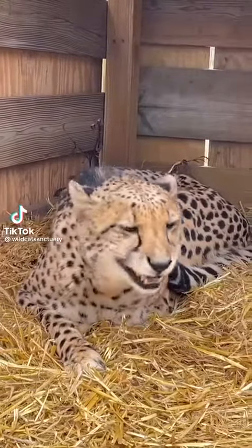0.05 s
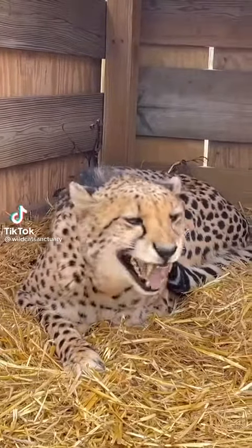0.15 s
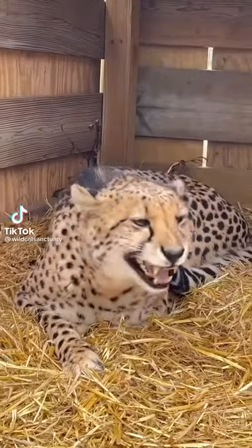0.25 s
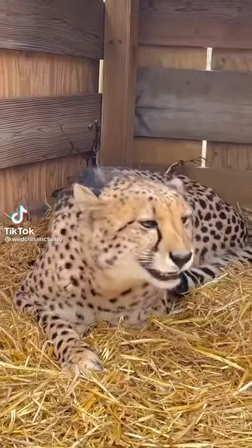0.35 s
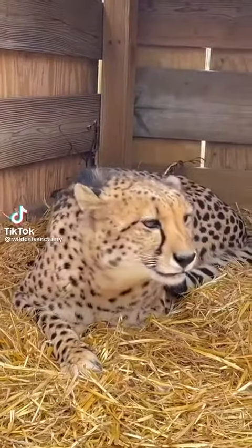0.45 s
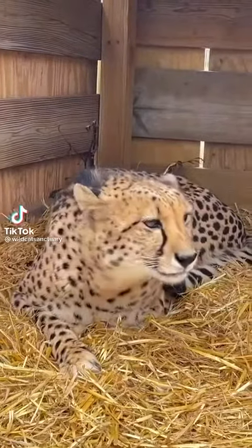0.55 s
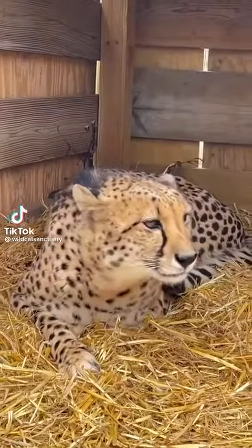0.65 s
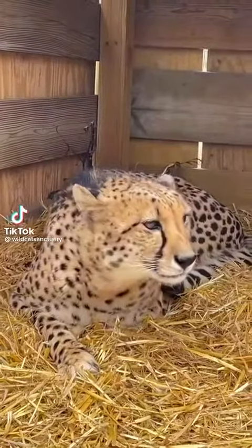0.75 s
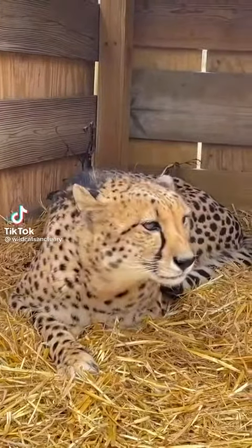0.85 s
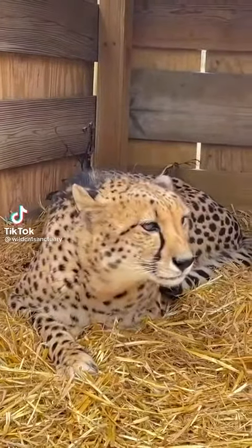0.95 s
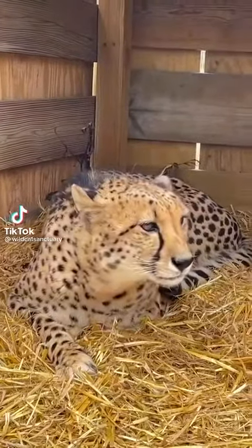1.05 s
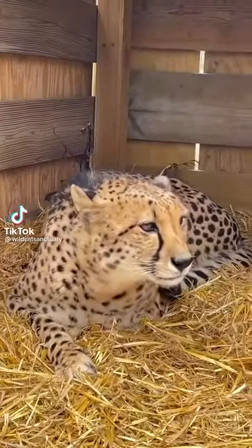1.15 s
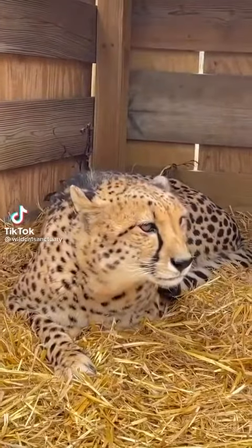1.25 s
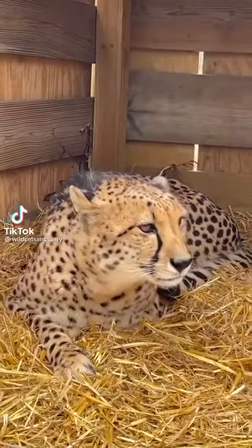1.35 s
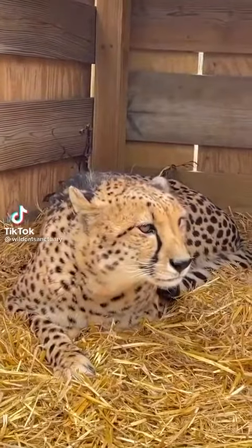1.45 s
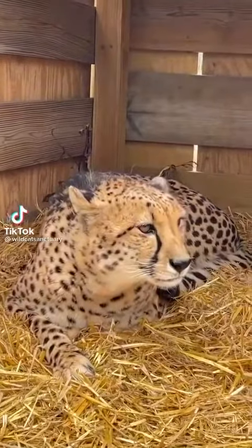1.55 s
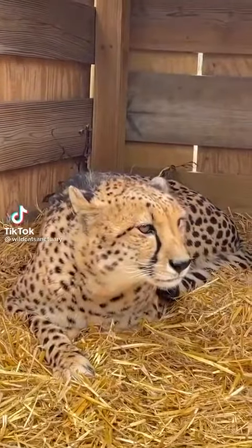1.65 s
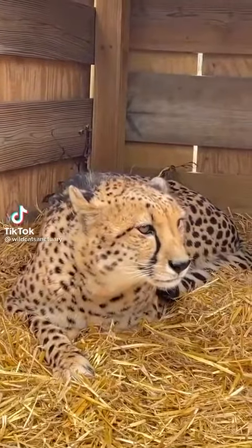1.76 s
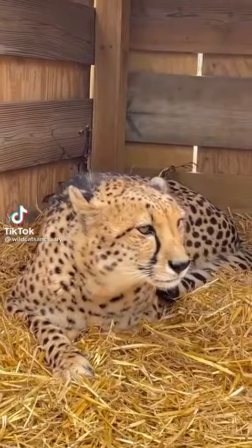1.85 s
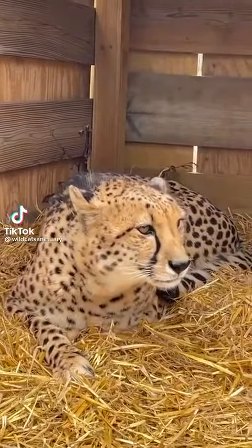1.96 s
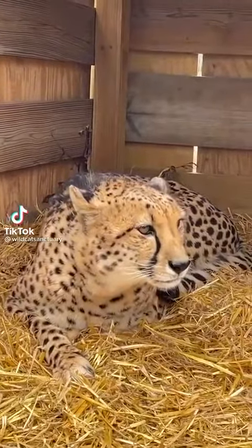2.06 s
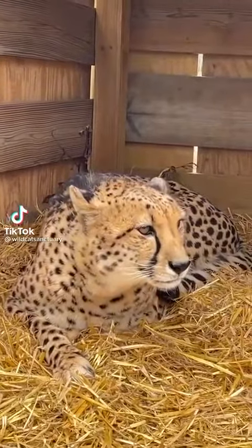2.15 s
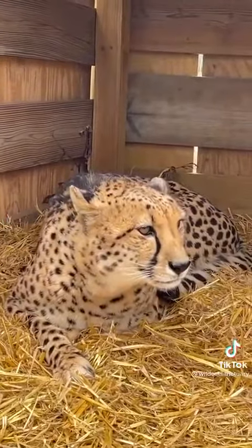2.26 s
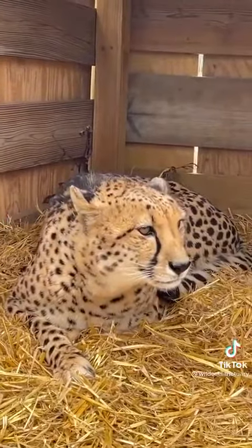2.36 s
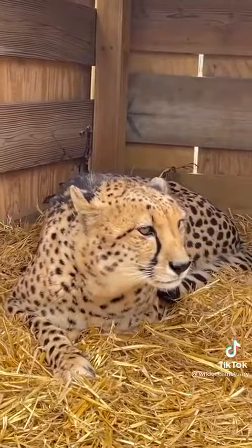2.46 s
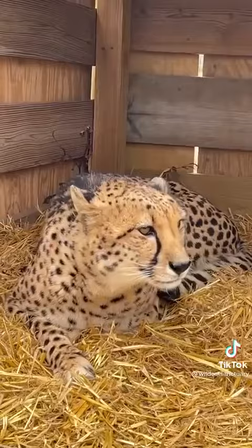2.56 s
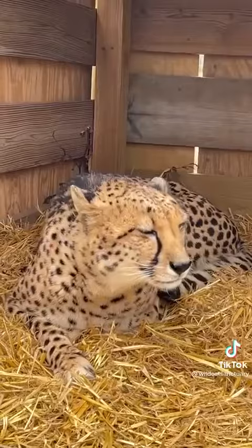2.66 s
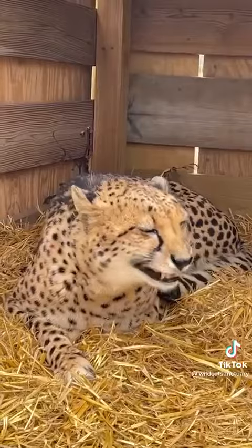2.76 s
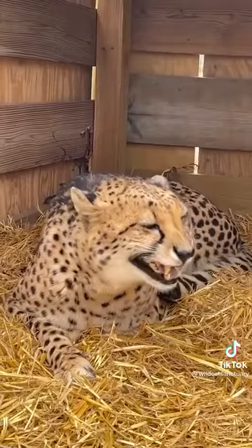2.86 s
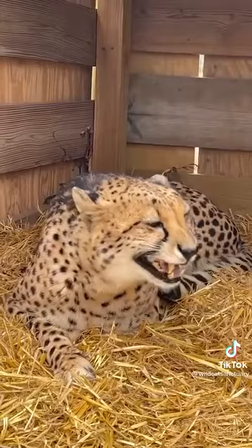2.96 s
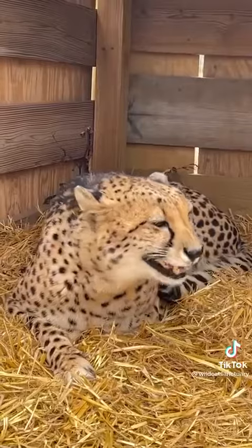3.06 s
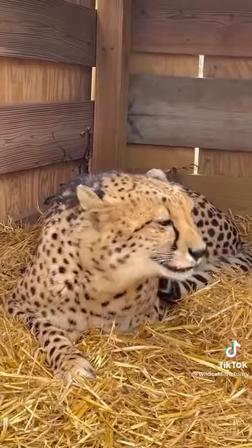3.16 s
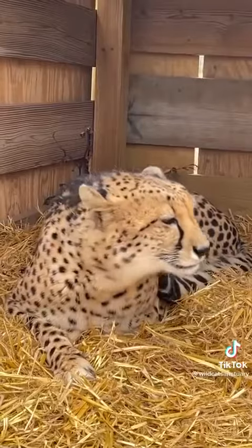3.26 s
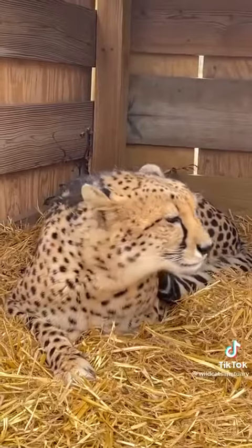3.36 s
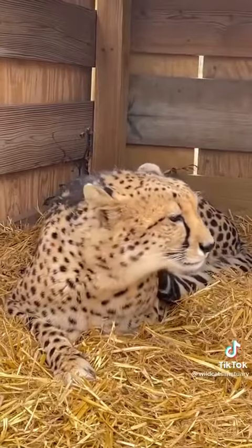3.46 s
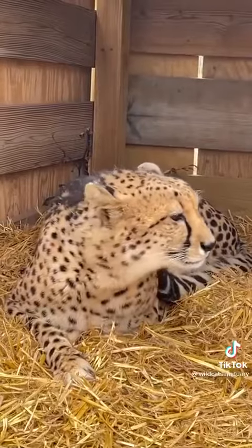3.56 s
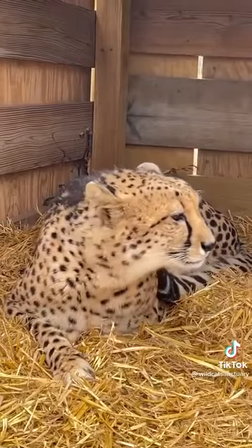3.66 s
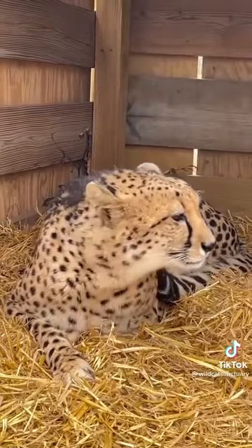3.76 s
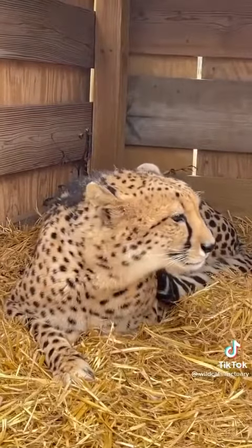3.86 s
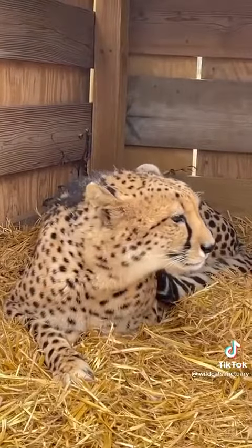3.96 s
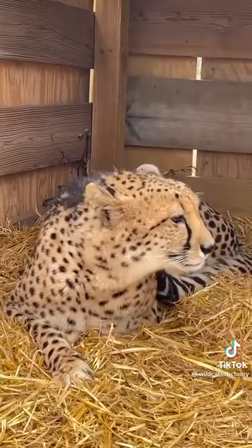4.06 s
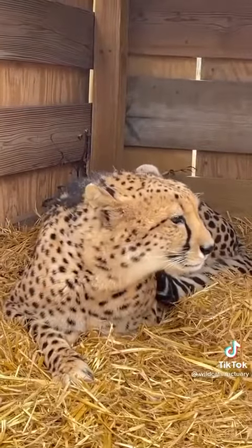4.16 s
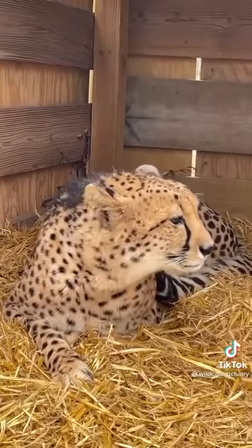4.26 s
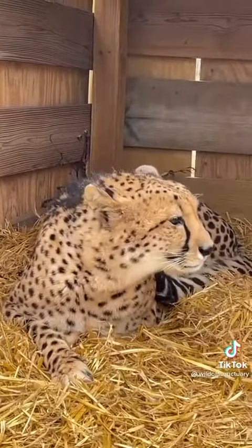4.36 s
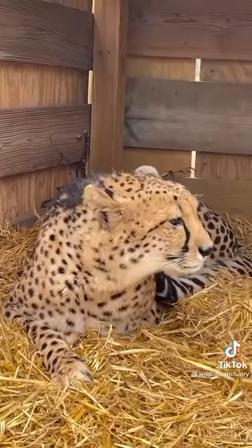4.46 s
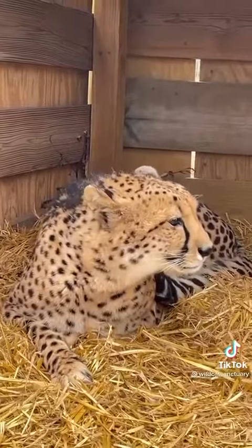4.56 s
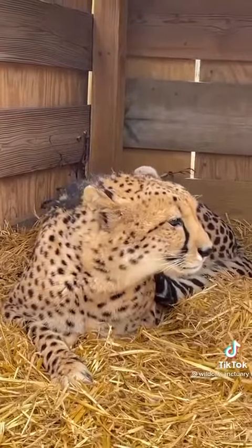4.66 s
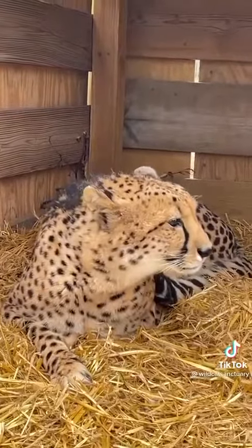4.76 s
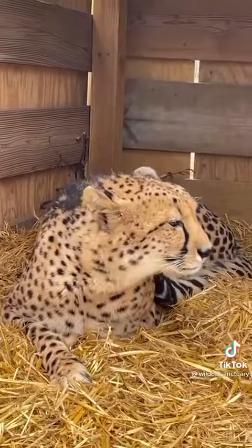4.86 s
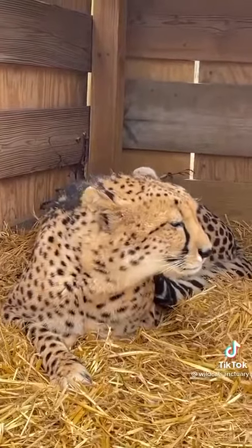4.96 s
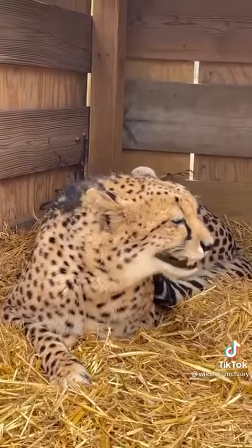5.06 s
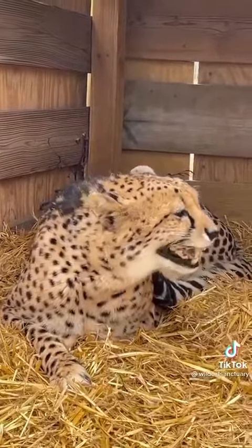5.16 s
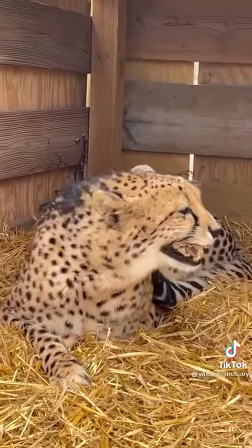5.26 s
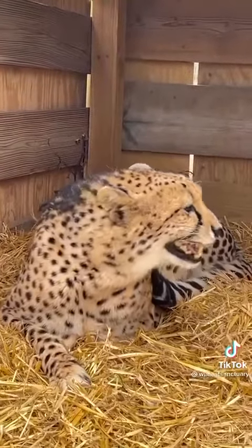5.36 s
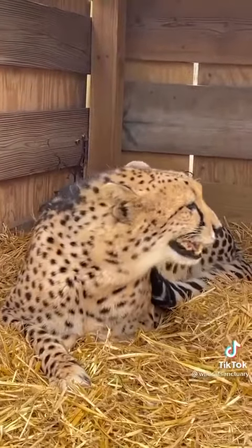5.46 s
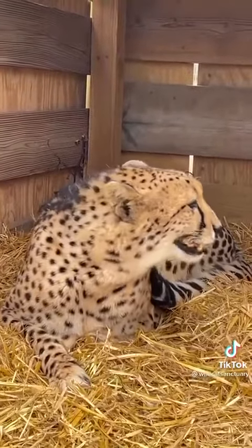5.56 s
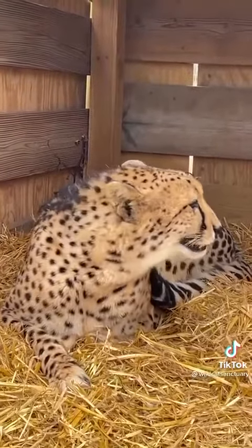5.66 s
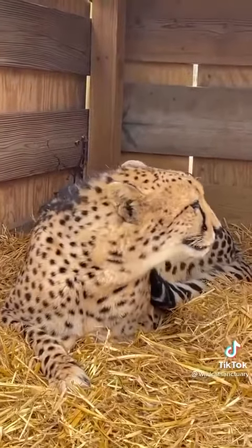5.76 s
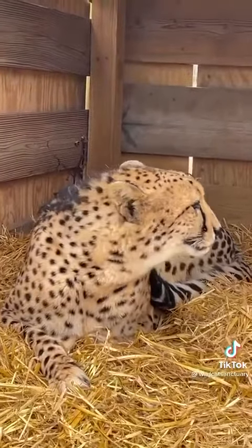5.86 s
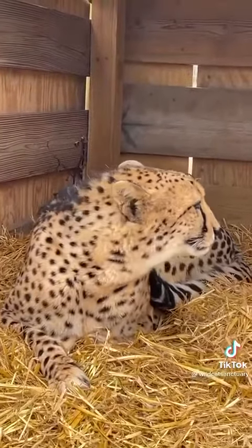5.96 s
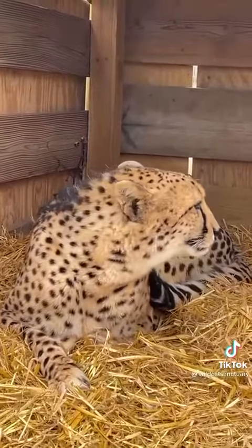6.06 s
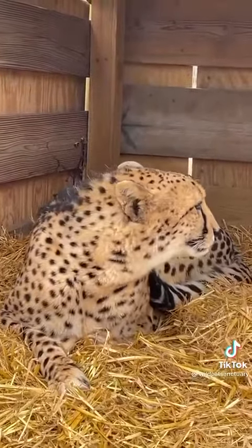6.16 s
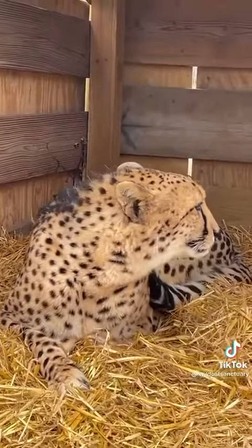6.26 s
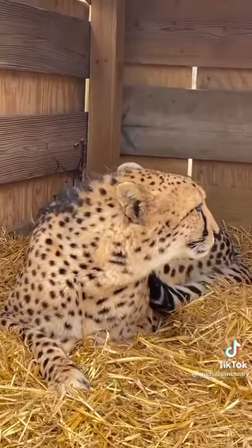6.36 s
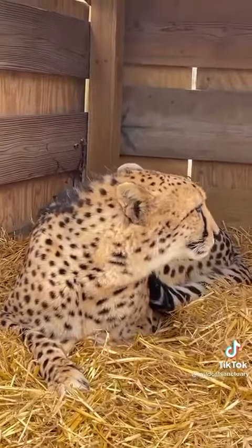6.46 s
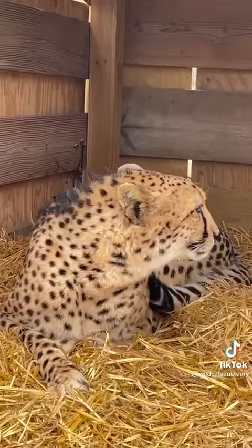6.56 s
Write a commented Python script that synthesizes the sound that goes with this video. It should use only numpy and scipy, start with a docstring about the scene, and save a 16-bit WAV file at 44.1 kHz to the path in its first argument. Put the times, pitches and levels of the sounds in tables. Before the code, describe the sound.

A cheetah gives three short, bird-like chirps that slide down in pitch, while a one-cylinder engine outside slows from low rumble to quiet idling throb.

```python
"""Outside a wooden, straw-bedded shelter a one-cylinder engine slows to idle: firing pulses ring exhaust
resonances. Inside, a couple of metres from a phone, a big cat chirps at 0.1, 2.7 and 5.1 s: gliding partials
plus breath noise, echoed by the boards. Dry straw ticks come before or during the chirps; brakes rub softly
(noise) at 0.6 and 2.15 s, then squeal (pure tones) from 2.4 to 3.5 s. At 6.5 s the straw gives a dull thud and
a rustle. Faint open-air hiss, made of coloured noise, lies behind throughout."""
import sys
import numpy as np
from scipy import signal
from scipy.fft import rfft, irfft
from scipy.io import wavfile
from scipy.ndimage import uniform_filter1d

SR = 44100
rng = np.random.default_rng(int(sys.argv[2]) if len(sys.argv) > 2 else 0)


def unload_audio(sound):
    """Save the sound as a 16-bit wav file, at the path given as the first command line argument."""
    columns = np.transpose(np.atleast_2d(sound))
    # keep every value between -1 and 1, then stretch to whole-number steps
    steps = np.round(np.clip(columns, -1, 1) * 32767)
    wavfile.write(sys.argv[1], SR, steps.astype(np.int16))


N = 291060  # samples, 6.6 s

# Glide and spectrum of the voice, one table a call: time_s, pitch_hz, partial_1_db to partial_5_db,
# palate_db, nasal_db, hiss_db, rasp_db (relative to the partials)
CHIRP_GLIDES = [
    [(0.088, 775, -61.5, -34.5, -70.5, -76.5, -103, -92, -75.5, -103, -35),
     (0.112, 750.7, -42.5, -38.5, -32.5, -52.5, -79.5, -63.5, -65.5, -88, -29),
     (0.13, 779, -59.5, -33.5, -50, -33.5, -93.5, -50, -55.5, -52.5, -33),
     (0.14, 822.2, -49.5, -29, -48, -36.5, -60.5, -57, -63.5, -52.5, -32.5),
     (0.154, 828.4, -45.5, -28.5, -41.5, -47, -50, -55, -63, -50.5, -30),
     (0.168, 826, -43.5, -27.5, -44, -43, -50, -51, -62.5, -69, -30.5),
     (0.184, 788, -39.5, -26, -49, -31, -58, -36, -64, -69.5, -34),
     (0.2, 733, -42.5, -26, -35.5, -28, -88, -45.5, -58.5, -85, -41.5),
     (0.222, 660, -34.5, -16, -19, -60.5, -35, -53, -57, -57.5, -35.5),
     (0.236, 621.7, -35, -17, -22.5, -38.5, -51.5, -44.5, -60, -58, -39),
     (0.262, 592.6, -32.5, -19, -23, -55, -49.5, -56.5, -71, -57, -31),
     (0.278, 560, -33.5, -27, -29.5, -56.5, -44, -65.5, -64.5, -78, -37),
     (0.292, 559.3, -39, -35.5, -31, -57.5, -56, -76, -67, -64, -36),
     (0.314, 579.4, -40.5, -47, -38, -75.5, -81, -84.5, -72, -99.5, -36.5),
     (0.328, 609.8, -49.5, -48, -49, -91.5, -96.5, -82, -71, -74, -36),
     (0.356, 668, -52.5, -43.5, -76, -91.5, -106, -99, -79.5, -103, -34.5),
     (0.372, 676, -55, -45, -66, -88, -100, -90, -80.5, -92, -29.5),
     (0.398, 669, -60.5, -41, -76.5, -92.5, -100, -86, -65.5, -82, -30),
     (0.414, 656, -61.5, -40.5, -58, -80, -91, -96.5, -88.5, -87, -30.5),
     (0.428, 644.5, -52, -45, -48.5, -72.5, -82.5, -97.5, -92, -85, -40.5),
     (0.442, 547.1, -35, -50.5, -54, -74.5, -76.5, -101, -93, -88.5, -26),
     (0.468, 555.5, -55, -58.5, -84.5, -91, -90, -94, -88.5, -89, -28.5),
     (0.49, 516.5, -67.5, -74.5, -74.5, -80, -89.5, -86, -88, -88.5, -32.5)],
    [(2.704, 593, -50, -49, -65, -78, -70.5, -101, -97.5, -82, -27),
     (2.736, 555, -40.5, -35, -35.5, -52.5, -67.5, -97, -62, -81, -17),
     (2.752, 566, -35.5, -34.5, -32, -47.5, -52, -74.5, -59.5, -77, -40),
     (2.762, 581, -38, -26, -28.5, -93, -64.5, -74, -60, -70, -41),
     (2.78, 625.4, -40.5, -30, -38.5, -50, -53.5, -66, -57.5, -82, -45),
     (2.826, 671.8, -46, -24.5, -30.5, -52, -64.5, -63.5, -58, -85, -33.5),
     (2.848, 683.5, -44.5, -24.5, -25, -49, -55.5, -60.5, -58.5, -70, -34),
     (2.874, 687.6, -45, -25.5, -28, -43, -52.5, -63, -62, -62.5, -35),
     (2.892, 668.8, -37.5, -18.5, -25.5, -45.5, -44.5, -63.5, -62, -67, -33.5),
     (2.91, 656.6, -36, -23.5, -21.5, -44.5, -47, -53.5, -57, -59.5, -31),
     (2.96, 599, -32.5, -22, -25.5, -48.5, -45.5, -56.5, -56.5, -72, -33),
     (3.012, 551.4, -31.5, -25, -25, -42, -46, -73, -58.5, -79, -34.5),
     (3.038, 552.6, -31.5, -30.5, -27.5, -74.5, -48, -88.5, -55.5, -83, -27),
     (3.074, 534.8, -34, -29, -24, -48.5, -52, -80, -59.5, -73.5, -36.5),
     (3.118, 525.1, -39, -30, -33, -70.5, -69, -82.5, -64, -91, -32.5),
     (3.13, 518.7, -56, -40.5, -42, -59, -81, -90, -67, -79, -35.5),
     (3.162, 493.3, -36.5, -37.5, -51.5, -51.5, -64, -93, -73.5, -89, -34),
     (3.186, 459.8, -29.5, -60, -48.5, -54, -78, -102, -80, -85, -37),
     (3.204, 413.2, -36, -56.5, -34, -57.5, -77, -98, -89, -100, -31),
     (3.222, 414.7, -32, -60, -57.5, -63, -59.5, -91.5, -90, -103, -32),
     (3.256, 434, -54, -90.5, -74, -88, -91, -96, -98, -86, -24),
     (3.29, 435.3, -75, -87, -83, -80, -99, -90.5, -98, -100, -26)],
    [(5.067, 788, -78, -56.5, -74, -83, -100, -100, -89, -91, -22),
     (5.075, 760, -62, -38.5, -52.5, -57, -83.5, -92, -76, -89, -24.5),
     (5.084, 734.4, -40.5, -36.5, -56.5, -61, -71, -90, -70.5, -91, -24.5),
     (5.093, 643.3, -43, -36, -29, -49, -58, -86, -57, -92, -30),
     (5.1, 649.4, -40, -37, -25.5, -47, -50, -88, -61, -92, -33.5),
     (5.107, 671, -47, -28, -33.5, -42, -68.5, -80.5, -47.5, -72, -33),
     (5.121, 736.2, -47.5, -30.5, -51.5, -47.5, -71, -67, -48.5, -65, -43),
     (5.135, 741.7, -34, -35, -32.5, -55.5, -69, -79, -46, -70, -42.5),
     (5.148, 752.5, -40.5, -36, -40, -62.5, -72.5, -80.5, -51.5, -68, -33.5),
     (5.16, 727, -38, -38, -43.5, -60.5, -81, -78.5, -55.5, -74, -31.5),
     (5.171, 705.6, -54, -38.5, -50.5, -53.5, -83, -80, -56, -79, -32),
     (5.183, 686.7, -46, -35.5, -41.5, -59.5, -80, -82, -60.5, -83, -34),
     (5.212, 650.7, -40.5, -38.5, -42, -51.5, -62, -78.5, -63.5, -75.5, -33),
     (5.233, 631.5, -40.5, -27.5, -38, -51.5, -56.5, -76, -56, -68.5, -28),
     (5.283, 590.8, -36, -19.5, -38, -58.5, -49.5, -81, -65.5, -103, -36),
     (5.313, 577.3, -37, -28.5, -25.5, -48, -52.5, -89.5, -69, -77, -36.5),
     (5.367, 559.5, -41, -30.5, -26.5, -60, -50, -72.5, -64.5, -80.5, -34),
     (5.415, 548.3, -38.5, -42, -26, -43.5, -52.5, -72.5, -62.5, -76.5, -45.5),
     (5.511, 540.4, -40, -41, -28, -54.5, -64.5, -72.5, -62, -83, -34),
     (5.565, 513, -34.5, -31.5, -47.5, -52.5, -67.5, -89, -67, -103, -39),
     (5.591, 485.8, -48, -38.5, -46, -59, -85.5, -87.5, -73.5, -78, -30),
     (5.611, 474, -37, -51, -45.5, -52, -59.5, -95.5, -76, -103, -47.5),
     (5.637, 422, -26, -57, -43.5, -65.5, -79.5, -96, -87.5, -102, -30),
     (5.651, 423.5, -25.5, -48, -39, -62, -66, -88, -92, -103, -35.5),
     (5.667, 407.2, -31.5, -47.5, -41, -56, -53, -94, -89, -94, -38),
     (5.713, 442, -55, -79.5, -73, -76, -85, -105, -103, -103, -29.5),
     (5.74, 464, -65, -95, -78, -87.5, -94, -100, -100, -86.5, -35.5)],
]
# Resonances of the palate, then of the nose: centre_hz, width_hz, relative_level_db
PALATE_MODES = [(4050, 400, -4), (4800, 700, 0)]
NASAL_MODES = [(5450, 600, 0), (6250, 800, -5), (7400, 500, -22)]
# Brief dips of the voiced sound: centre_s, half_width_ms, depth_db
VOICE_CATCHES = [(0.211, 2.1, 0.5), (0.356, 15, 6), (2.941, 1.8, 3), (3.202, 5.8, 11.5), (5.123, 1.2, 1.5),
                 (5.174, 1.2, 6)]
# Moments when the voice breaks up: centre_s, half_width_ms, roughness (0-1)
VOICE_BREAKS = [(.09, 14, .35), (.355, 20, .75), (.48, 20, .5), (2.705, 20, .55), (2.77, 50, .12),
                (.21, 60, .06), (3.225, 30, .15), (3.28, 25, .6), (5.074, 10, .45), (5.12, 45, .2),
                (5.6, 20, .1), (5.72, 35, .4)]
# Every other cycle weakens, so half-pitch lines show: centre_s, half_width_ms, depth (0-1)
CYCLE_DOUBLING = [(.095, 10, .3), (.355, 22, .8), (2.72, 18, .4), (5.078, 12, .7), (5.125, 12, .35),
                  (5.165, 18, .2), (5.62, 20, .15)]
STEADY_ROUGHNESS, ROUGH_RASP_DB = 0.012, 14  # rasp gain in dB per unit of roughness
UPPER_RASP_DB, PALATE_RASP_DB, NASAL_RASP_DB = 8, -7, -7

# Reflections from the nearest boards: delay_ms, level_db (relative to the direct sound)
BOARD_ECHOES = [(2.1, -27), (4.7, -29), (7.9, -14)]
SHELTER_T60_S, SHELTER_DB = 0.19, -23.5
# Left-right difference by frequency: frequency_hz, left_lead_half_turns, left_minus_right_db
STEREO_DIFFERENCES = [(300, .05, 0), (900, .05, 2.5), (1400, -.09, 2), (1900, .06, 1), (2900, .2, 0),
                      (4300, .25, 0), (4950, 1, 0), (5350, 1.9, 0), (6700, 2, 0), (7900, 3, 0),
                      (9400, 3, 0), (11300, 4, 0)]

# Engine speed: time_s, firings_per_s
FIRING_RATE = [(0, 26.9), (.4, 25.5), (.8, 24.29), (1.3, 22.06), (1.8, 19.8), (2.2, 17.39), (2.6, 14.51),
               (3.1, 12.88), (3.5, 11.29), (4, 10.69), (4.4, 10.16), (4.9, 10.17), (5.5, 10.15), (6, 10.22),
               (6.6, 10.29)]
# Engine loudness: time_s, level_db
ENGINE_LEVEL = [(0, -25), (1, -29.5), (1.35, -33), (1.78, -34), (2.5, -42.5), (2.8, -46.5), (3.4, -48),
                (3.55, -44.5), (4.2, -47), (5.6, -45), (6.6, -49)]
# Exhaust resonances: centre_hz, width_hz, full_speed_db, idle_db (relative levels)
EXHAUST_MODES = [(50.4, 17, -12.5, -10.5), (70.7, 17, 0.5, 1), (97.2, 20.3, 5, -7.5), (121.5, 28, 1.5, -11),
                 (151.6, 40, -9.5, -22), (215.8, 36, -11.5, -31.5), (306, 88, -29, -52.5)]
FIRST_TURN_CYCLES = .16  # position in the firing cycle at 0 s
FIRING_JITTER_MS = .3  # standard deviation
YARD_ECHO_MS, YARD_ECHO_DB = 21.04, -2.5
# firing pulses against exhaust noise; the idle value fades over this share of the speed range
IDLE_FIRING_DB, RUNNING_FIRING_DB, PICKUP_SPEED = 1.5, -15.5, 0.067

# Soft brake rubs: centre_s, half_length_s, centre_hz, width_hz (each of two resonances), level_db
BRAKE_RUBS = [(.6, .3, 1500, 1900, -78), (2.15, .25, 1200, 350, -80)]
# Brake squeals: start_s, length_s, pitch_hz, level_db (rms at the top of the swell)
BRAKE_SQUEALS = [(2.445, .1, 12100, -58), (2.685, .035, 12130, -68), (2.722, .025, 12180, -54),
                 (2.755, .09, 12150, -60), (2.64, .1, 3225, -73), (3.44, .09, 2230, -82)]
# share of the length at which the top comes; dB below it at start and end
SQUEAL_PEAK_AT, SQUEAL_RISE_DB, SQUEAL_FALL_DB = 0.4, 18, 14

# Dry straw ticks: time_s, impulse_db
STRAW_TICKS = [(.397, -39), (2.5665, -37), (5.05, -55)]
THUD_S, THUD_DB, THUD_RISE_S, THUD_FALL_DB_S = 6.455, -39, 0.01, 45
RUSTLE_S, RUSTLE_DB, RUSTLE_RISE_S, RUSTLE_FALL_DB_S = 6.47, -59.5, 0.036, 140

# Hiss spectrum alike on both sides: frequency_hz, relative_density_db
AIR_SPECTRUM = [(120, -27), (200, 5), (247, -3.5), (431, -13), (656, -19), (1900, -24.5), (2840, -27.5),
                (4800, -35), (6240, -30), (7700, -37), (8550, -51), (10000, -27), (13000, -34.5)]
# Hiss spectrum of opposite sign left and right: frequency_hz, relative_density_db
WIDE_AIR_SPECTRUM = [(120, -30), (200, 3), (1050, -6.5), (1370, -12.5), (1970, -36.5), (2560, -25),
                     (4970, -23.5), (6030, -35), (7050, -18.5), (9330, -18.5), (13000, -36.5)]
AIR_DB, WIDE_AIR_DB = -68.5, -74.5
TOP_HZ = 13300


def undb(db):
    """Decibel law: a level in dB becomes an amplitude ratio."""
    return 10 ** (np.asarray(db) / 20)


def unit(x):
    """Normalisation: scale to an rms of 1."""
    return x / np.sqrt(np.mean(x ** 2))


def columns(table):
    """Linear interpolation: sample indices a table spans and its columns at each of them."""
    s, *cols = np.transpose(table)
    at = np.arange(int(s[0] * SR), min(int(s[-1] * SR), N))
    return at, [np.interp(at / SR, s, c) for c in cols]


def band(x, lo_hz, hi_hz, order=2):
    """Band limiting: a Butterworth filter passes one range of frequencies."""
    return signal.sosfilt(signal.butter(order, [lo_hz, hi_hz], "bandpass", fs=SR, output="sos"), x)


def ring(x, hz, width_hz):
    """Resonance: a two-pole filter with gain 1 at its centre."""
    return signal.lfilter(*signal.iirpeak(hz, hz / width_hz, fs=SR), x)


def walk(rate, size=N):
    """Random modulation: twice-smoothed noise wanders about rate times a second, with spread near 1."""
    pole = np.exp(-2 * rate / SR)
    noise = rng.standard_normal(SR * (size // SR + 1))
    return unit(signal.lfilter([1], np.convolve([1, -pole], [1, -pole]), noise))[:size]


def cat():
    """Source and filter: folds make gliding partials, the tract shapes them, breath turbulence pulses once a cycle."""
    out = np.zeros(N)
    for table in CHIRP_GLIDES:
        at, (hz, *partials_db, palate_db, nasal_db, hiss_db, rasp_db) = columns(table)
        n = len(at)

        def bumps(rows):
            return sum(size * np.exp(-((at / SR - s) * 1000 / ms) ** 2) for s, ms, size in rows)

        def total_db(levels_db):
            return 10 * np.log10(np.sum(undb(levels_db) ** 2, axis=0))

        rough = STEADY_ROUGHNESS + bumps(VOICE_BREAKS)
        pitch_jitter = (0.0022 + 0.07 * rough) * walk(300, size=n)
        hz = uniform_filter1d(hz, int(0.012 * SR)) * (1 + pitch_jitter)
        phase = 2 * np.pi * np.cumsum(hz) / SR

        uneven = bumps(CYCLE_DOUBLING) * np.sin(phase / 2)
        low = 0
        for k, db in enumerate(partials_db, start=1):
            flutter_db = (.55 * k + 5.0 * rough) * walk(70, size=n)  # higher partials are patchier
            doubling = 1 + (k > 1) * uneven  # spares the fundamental
            low = low + np.sqrt(2) * undb(db + flutter_db) * doubling * np.sin(k * phase)
        palate = undb(palate_db - 1) * overtones(hz, phase, 6, PALATE_MODES, patchy_db=5)
        nasal = undb(nasal_db - 1.5) * overtones(hz, phase, 6, NASAL_MODES, patchy_db=5)

        # turbulence at the folds fills the gaps between partials
        puff = (1 + 3.9 * np.sin(phase)) * rng.standard_normal(SR)[:n]
        grain_db = ROUGH_RASP_DB * rough + 3.0 * walk(90, size=n)
        lower_db = total_db(partials_db[:3]) + rasp_db + grain_db
        upper_db = total_db(partials_db[3:]) + rasp_db + UPPER_RASP_DB + grain_db
        nasal_puff = band(puff, 4850, 6700, order=3) + 8 * rough * band(puff, 5000, 5900, order=3)
        rasp = undb(lower_db) * unit(band(puff, 1200, 2500, order=4))
        rasp += undb(upper_db) * unit(band(puff, 3200, 3450, order=4))
        rasp += undb(palate_db + PALATE_RASP_DB) * unit(band(puff, 3500, 5300, order=3))
        rasp += undb(nasal_db + NASAL_RASP_DB) * unit(nasal_puff)
        hiss = undb(hiss_db + 3.0 * walk(25, size=n)) * unit(band(puff, 9600, 12500, order=4))

        fade_in, fade_out = (at - at[0]) / (0.004 * SR), (at[-1] - at) / (0.012 * SR)
        edge = np.clip(np.minimum(fade_in, fade_out), 0, 1)
        voiced = undb(-bumps(VOICE_CATCHES)) * (low + palate + nasal)
        out[at] = edge * (voiced + rasp + hiss)
    return out


def overtones(hz, phase, first, modes, patchy_db):
    """Formant weighting: eleven partials glide through fixed resonances, each fluttering alone."""
    tone, power = 0, 0
    for k in range(first, first + 11):
        gain = sum(undb(db) / (1 + (2 * (k * hz - f) / w) ** 6) for f, w, db in modes)
        power = power + gain ** 2 / 2
        flutter = undb(patchy_db * walk(170, size=len(hz)))
        tone = tone + gain * flutter * np.sin(k * phase + rng.uniform(0, 2 * np.pi))
    return tone / np.sqrt(power)


def shelter(x):
    """Reverberation: direct sound and board echoes, then a short dull decay that differs left and right."""
    t = np.arange(SR // 2) / SR
    path = np.zeros(SR // 50)
    path[0] = 1
    for ms, db in BOARD_ECHOES:
        path[int(ms * SR / 1000)] += undb(db)
    decay = undb(-60 * t / SHELTER_T60_S) * (t > .008)
    tail = band(rng.standard_normal((2, len(t))), 360, 2300) * decay
    tail *= undb(SHELTER_DB) / np.sqrt(np.sum(tail ** 2) / 2)
    early = signal.fftconvolve(x, path)[:N]
    return stereo_phase(early) + signal.fftconvolve(x[None], tail)[:, :N]


def stereo_phase(x):
    """Stereo phase: each frequency gets its own left-right phase and level difference, which widens the treble."""
    hz, lead, pan_db = np.transpose(STEREO_DIFFERENCES)
    f = np.arange(N // 2 + 1) * SR / N
    half = undb(np.interp(f, hz, pan_db) / 2) * np.exp(.5j * np.pi * np.interp(f, hz, lead))
    return irfft(rfft(x) * np.array([half, 1 / half]), N)


def engine():
    """Impulse excitation: uneven firings ring the exhaust, intake strokes answer, and speed adds clatter."""
    t = np.arange(-SR // 2, N) / SR  # already running before the start
    rate = np.interp(t, *np.transpose(FIRING_RATE))
    turn = np.cumsum(rate) / SR
    turn += FIRST_TURN_CYCLES - turn[SR // 2]
    speed = (rate - rate.min()) / np.ptp(rate)  # 0 at the slowest, 1 at the fastest

    chance = rng.standard_normal((len(t) // 1000, 3))
    pulses = np.zeros(len(t))
    # firing, then intake: lag in cycles, level dB, scatter dB
    for stroke, (lag, db, scatter_db) in enumerate([(0, 0, 2.5), (.45, -14, 3.0)]):
        at = np.flatnonzero(np.diff(np.floor(turn - lag)) > 0)
        jitter = (FIRING_JITTER_MS * SR / 1000 * chance[:len(at), 2]).astype(int)
        at = np.clip(at + jitter, 0, len(t) - 1)
        unevenness = 1 - .9 * speed[at]  # idling is less even
        pulses[at] += undb(db + scatter_db * unevenness * chance[:len(at), stroke])
    # thrown back by a near wall
    pulses += undb(YARD_ECHO_DB) * np.roll(pulses, int(YARD_ECHO_MS * SR / 1000))

    # single firings stand out most at idle
    firing_db = RUNNING_FIRING_DB + (IDLE_FIRING_DB - RUNNING_FIRING_DB) * np.exp(-speed / PICKUP_SPEED)
    puffs = uniform_filter1d(uniform_filter1d(pulses, SR // 700), SR // 520)  # each lasts a few ms
    flow_noise = undb(-7 - 21 * speed) * rng.standard_normal(len(t)) / np.sqrt(SR)
    drive = puffs * undb(firing_db) / np.sqrt(rate) + flow_noise
    pipe = np.zeros(len(t))
    for k, (f, w, full_db, idle_db) in enumerate(EXHAUST_MODES):
        gain = undb(idle_db + speed * (full_db - idle_db))
        pipe += (-1) ** k * gain * ring(ring(drive, f, w), f, 3.5 * w)
    pipe = pipe / np.sqrt(uniform_filter1d(pipe ** 2, SR // 2))  # even power; the level table sets loudness

    rattle = (1 + 0.2 * np.cos(2 * np.pi * turn)) * rng.standard_normal(len(t))
    low_clatter = undb(-41.0 + 11.0 * speed) * unit(band(rattle, 220.0, 430, order=3))
    high_clatter = undb(-43.0) * unit(band(rattle, 900, 2100))
    high_clatter += undb(-60.0) * unit(band(rattle, 4200, 8800))
    high_clatter += undb(-59.0) * unit(band(rattle, 9700, 12000, order=4))
    clatter = low_clatter + speed ** 0.98 * high_clatter
    level_db = np.interp(t, *np.transpose(ENGINE_LEVEL))
    return (undb(level_db) * (pipe + (0.39 + speed ** 3) * clatter))[SR // 2:]


def brakes():
    """Friction: soft rubs are resonant noise; squeals are thin tones that chatter, swell and fade."""
    out = np.zeros(N)
    for s, half, hz, width, db in BRAKE_RUBS:
        swell = np.exp(-((np.arange(N) / SR - s) / half) ** 4)
        out += undb(db) * swell * unit(ring(ring(rng.standard_normal(N), hz, width), hz, width))
    for s, length, hz, db in BRAKE_SQUEALS:
        swell = [(s, -SQUEAL_RISE_DB), (s + SQUEAL_PEAK_AT * length, 0), (s + length, -SQUEAL_FALL_DB)]
        at, (fade_db,) = columns(swell)
        chatter_db = 1.5 * walk(68, size=len(at))
        out[at] += np.sqrt(2) * undb(db + fade_db + chatter_db) * np.sin(2 * np.pi * hz * at / SR)
    return out


def straw():
    """Transient noise: lone impulses tick; decaying noise bands make a shuffle's dull thud and rustle."""
    t = np.arange(N) / SR
    noise = rng.standard_normal((2, N))

    def swell(s, db, rise, fall):
        return np.clip((t - s) / rise, 0, 1) * undb(db - fall * np.maximum(t - s, 0))

    thud = swell(THUD_S, THUD_DB, THUD_RISE_S, THUD_FALL_DB_S)
    rustle = swell(RUSTLE_S, RUSTLE_DB, RUSTLE_RISE_S, RUSTLE_FALL_DB_S)
    out = thud * unit(band(noise[0], 57, 190, order=4))
    out += rustle * unit(ring(noise[1], 2040, 1300) + 0.3 * ring(noise[1], 5600, 900))
    for s, db in STRAW_TICKS:
        out[int(s * SR)] += undb(db)
    return out


def air():
    """Sum and difference: a shared hiss and one of opposite sign each flicker a little and widen the sound."""
    mid = undb(AIR_DB + 1 * walk(3.4)) * coloured(AIR_SPECTRUM)
    wide = undb(WIDE_AIR_DB + 1.5 * walk(5.7)) * coloured(WIDE_AIR_SPECTRUM)
    return np.array([mid + wide, mid - wide])


def coloured(spectrum):
    """Spectral shaping: white noise weighted along a log-frequency curve, rms 1."""
    hz, db = np.transpose(spectrum)
    f = np.maximum(np.arange(N // 2 + 1) * SR / N, 1)
    gain = undb(np.interp(np.log(f), np.log(hz), db))
    return unit(irfft(rfft(rng.standard_normal(N)) * gain, N))


def scene():
    """Superposition: the sound fields of all sources add."""
    return shelter(cat()) + engine() + brakes() + stereo_phase(straw()) + air()


def record(dry):
    """Low-pass filtering: the phone cuts the top steeply."""
    return signal.sosfilt(signal.ellip(8, .2, 25, TOP_HZ, fs=SR, output="sos"), dry)


dry = scene()
out = record(dry)
unload_audio(out)
```